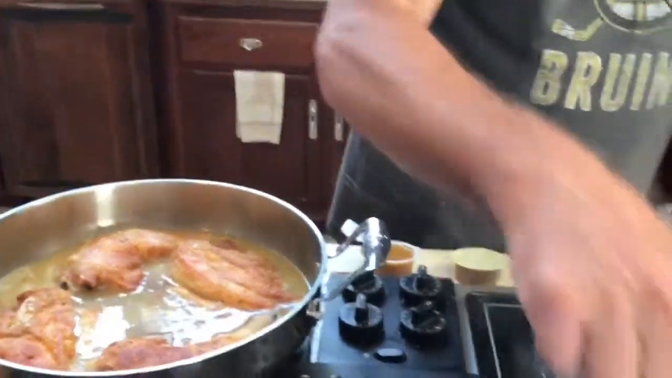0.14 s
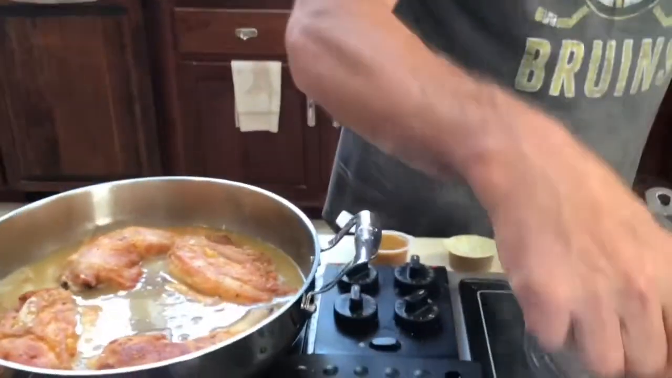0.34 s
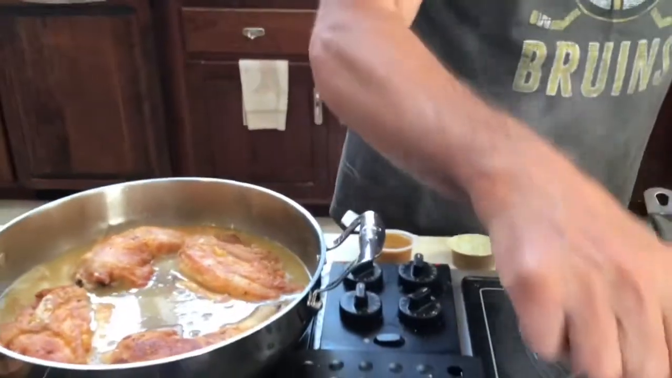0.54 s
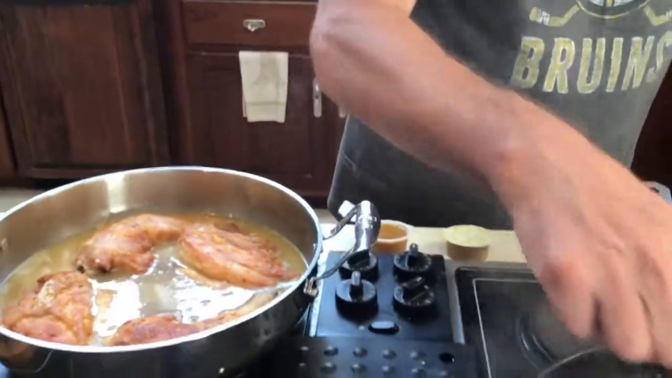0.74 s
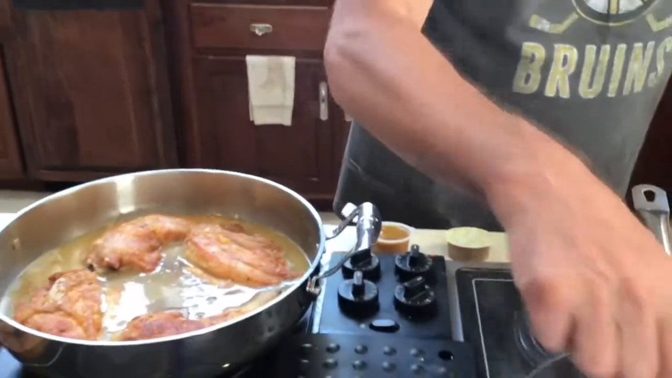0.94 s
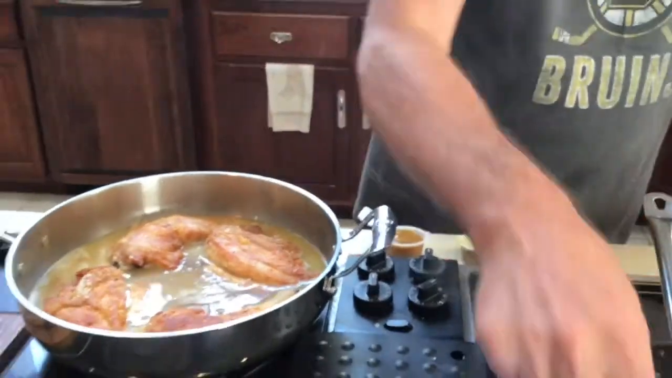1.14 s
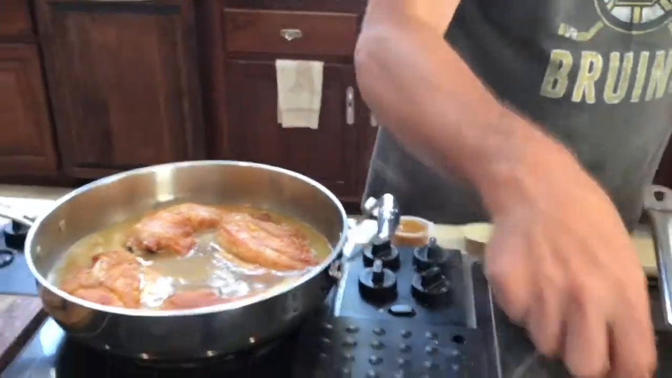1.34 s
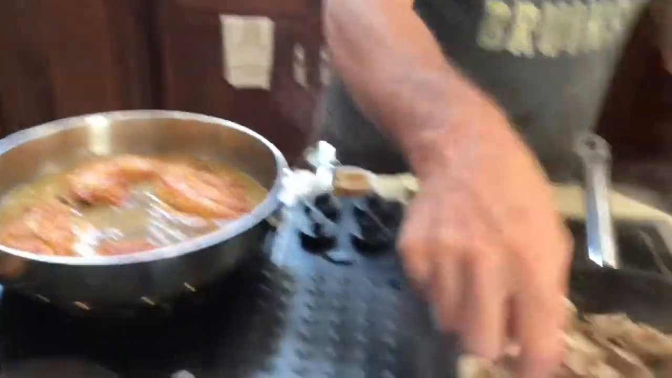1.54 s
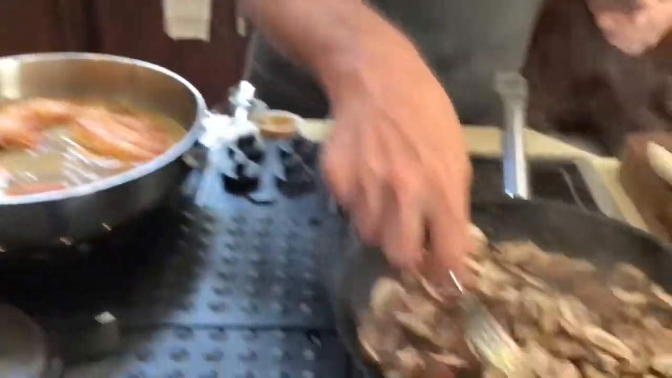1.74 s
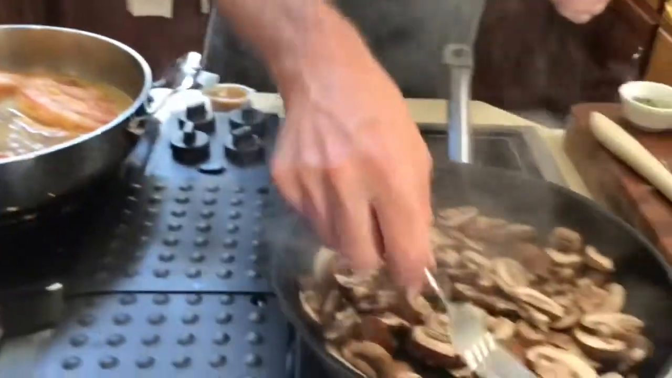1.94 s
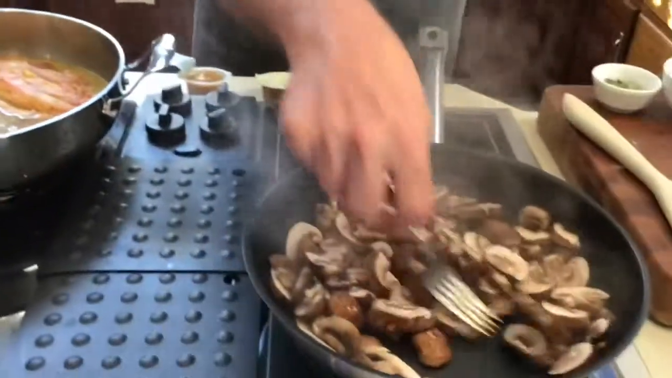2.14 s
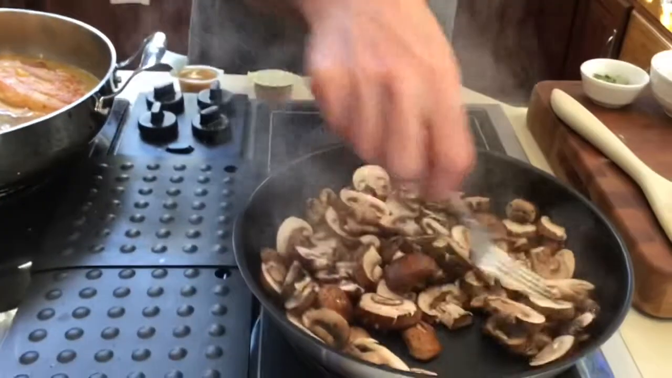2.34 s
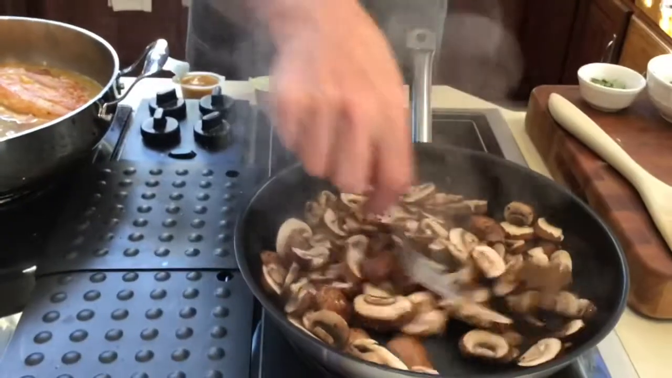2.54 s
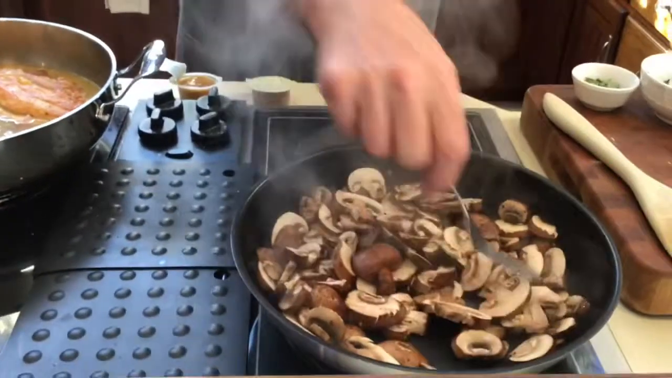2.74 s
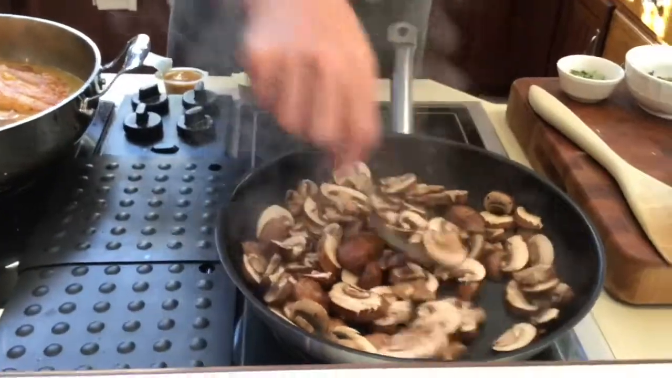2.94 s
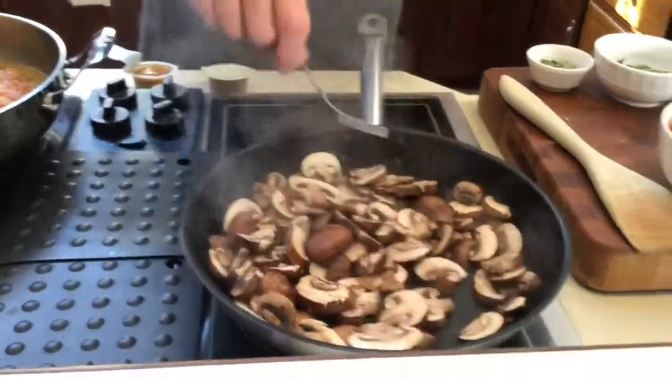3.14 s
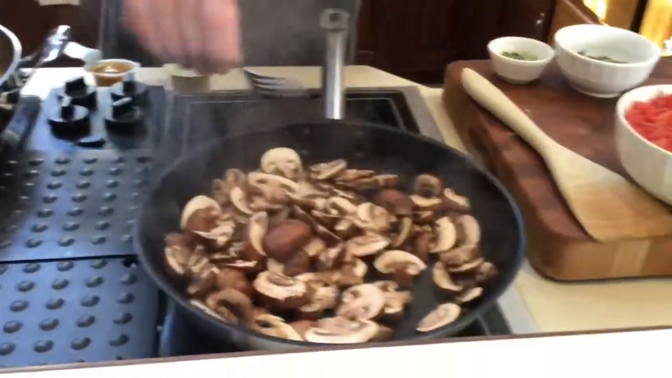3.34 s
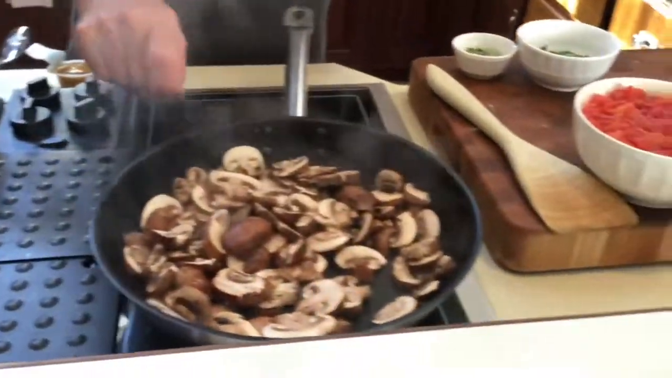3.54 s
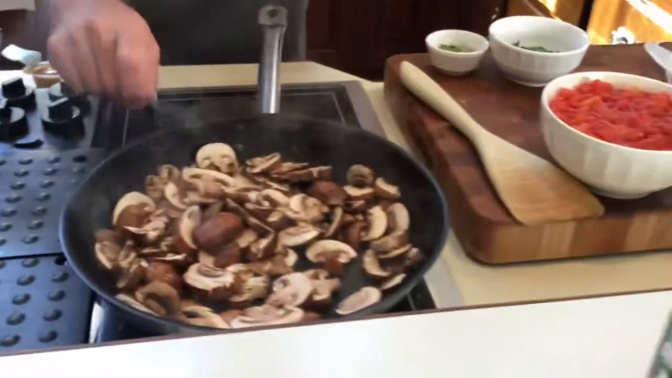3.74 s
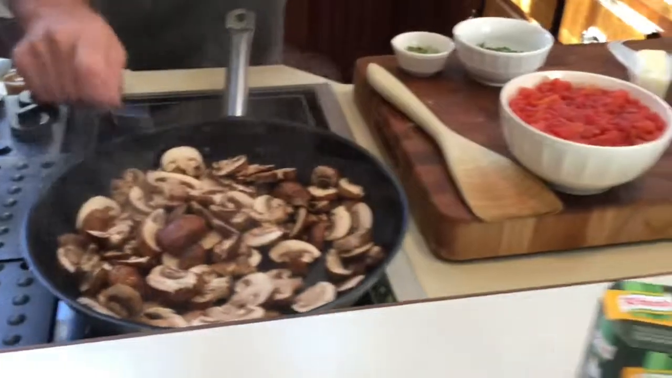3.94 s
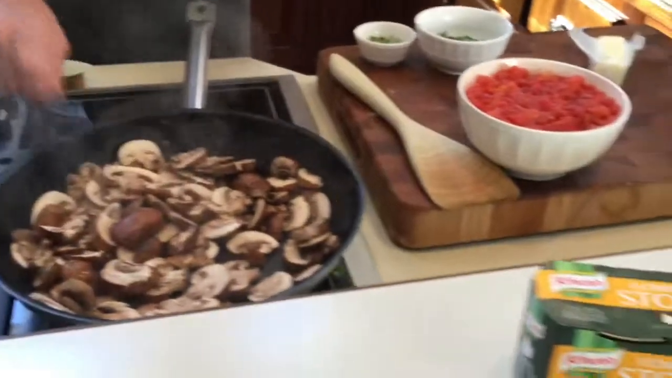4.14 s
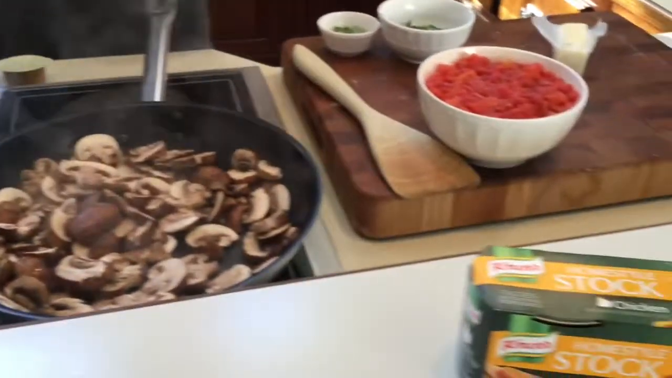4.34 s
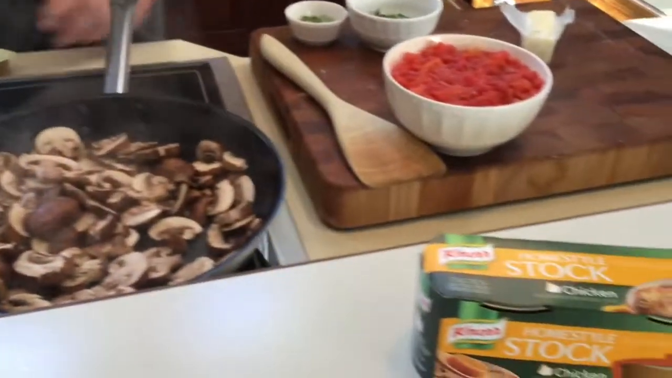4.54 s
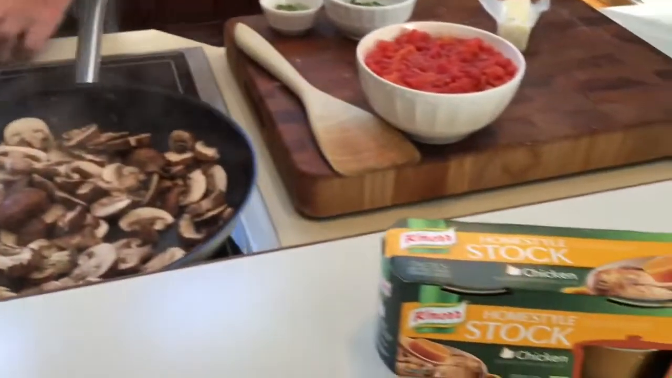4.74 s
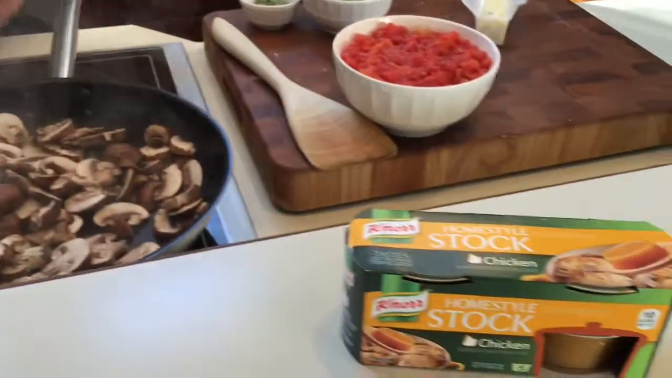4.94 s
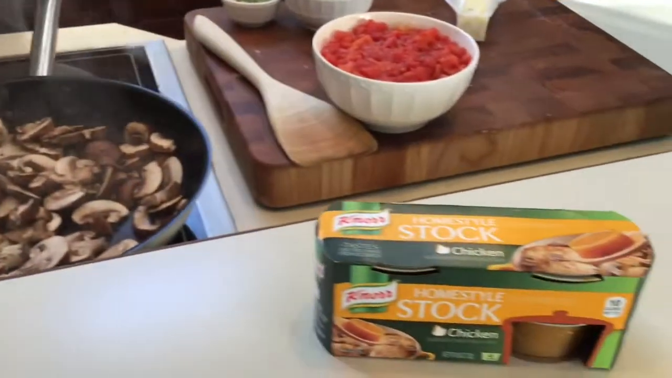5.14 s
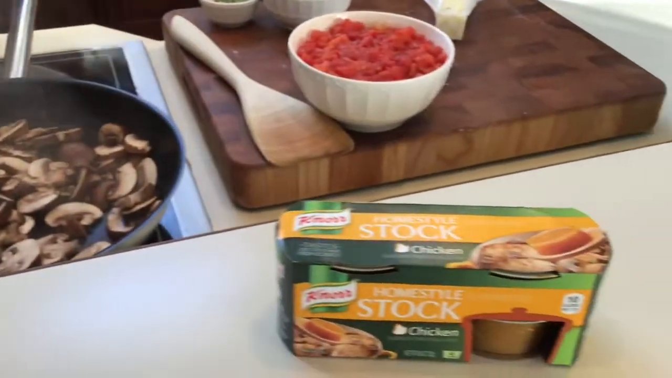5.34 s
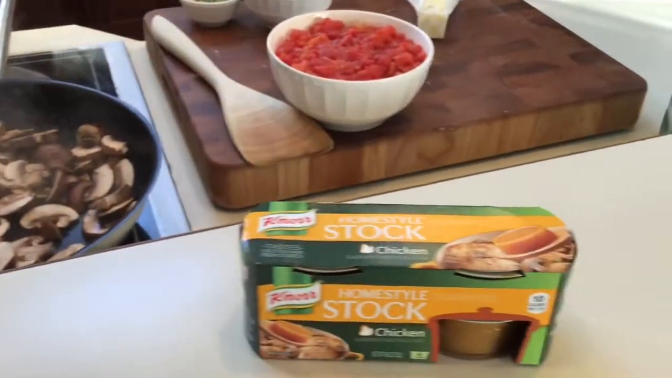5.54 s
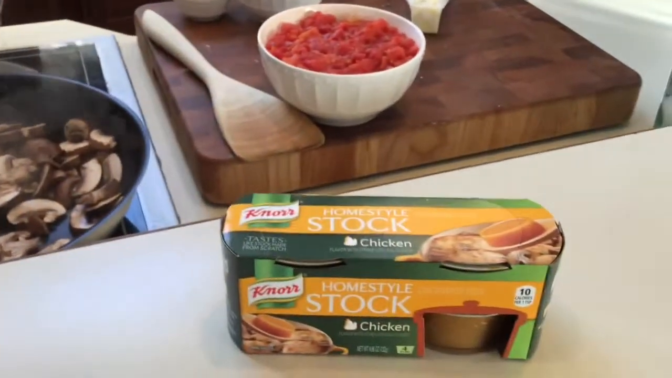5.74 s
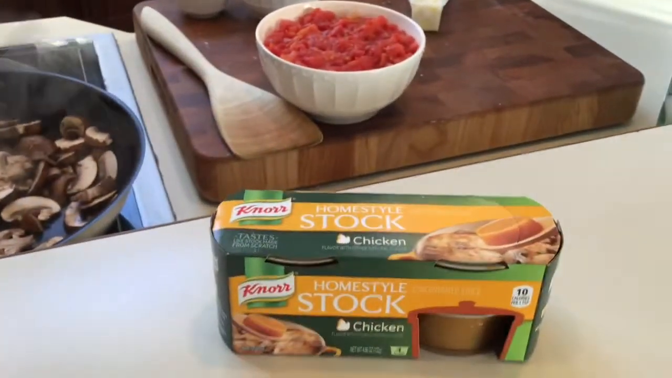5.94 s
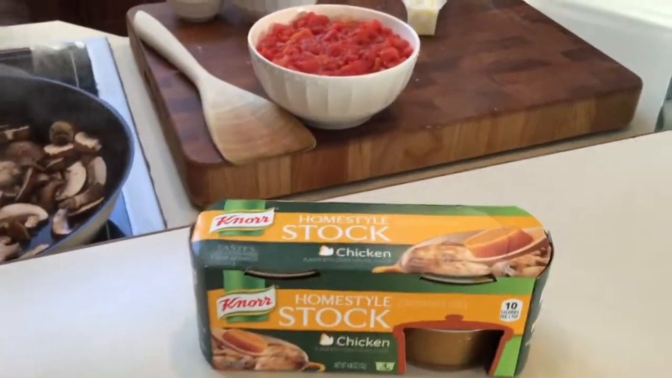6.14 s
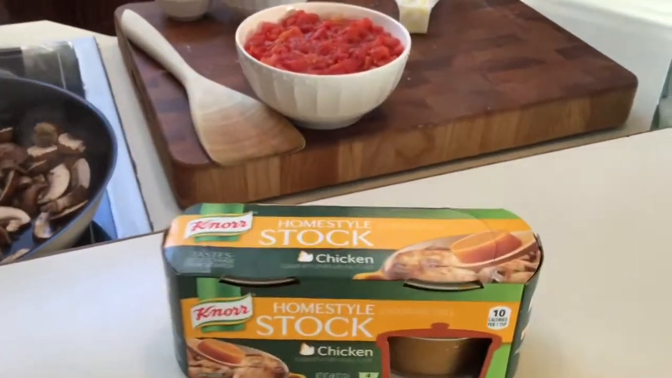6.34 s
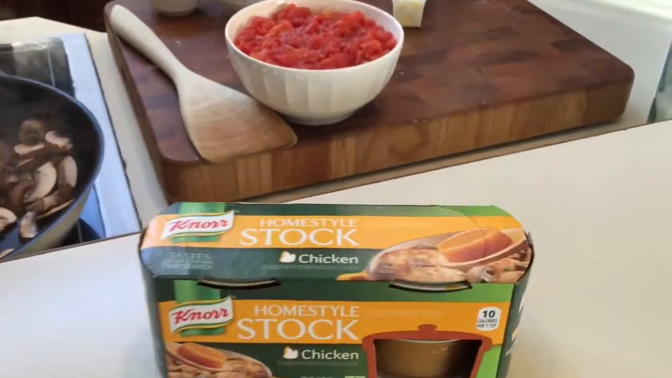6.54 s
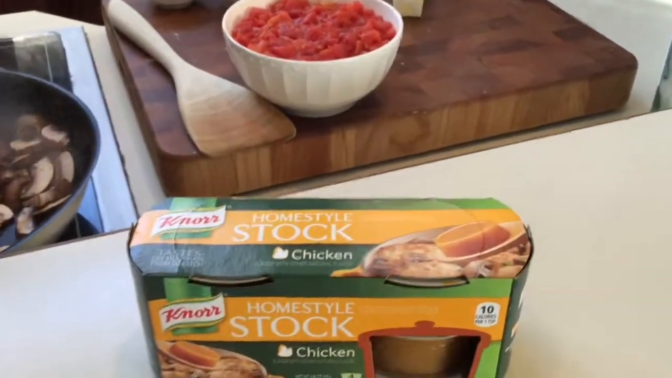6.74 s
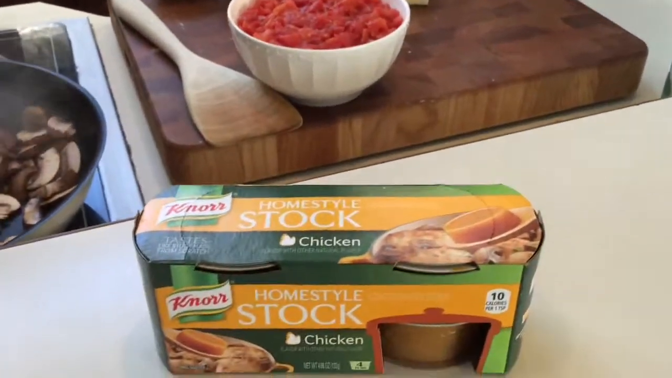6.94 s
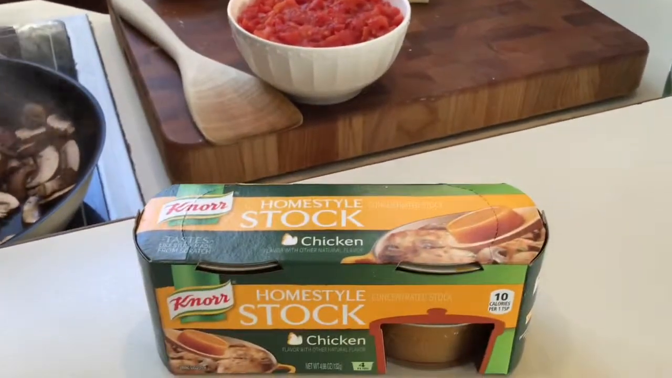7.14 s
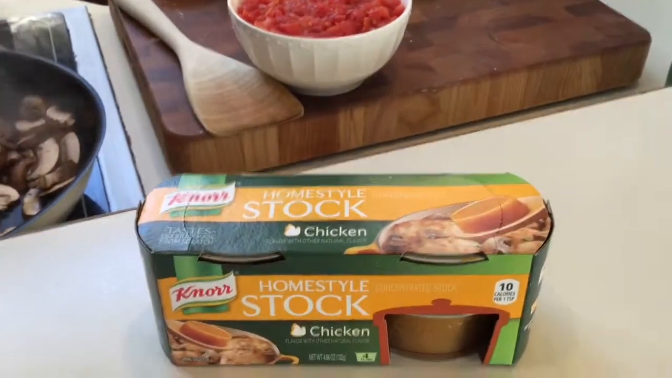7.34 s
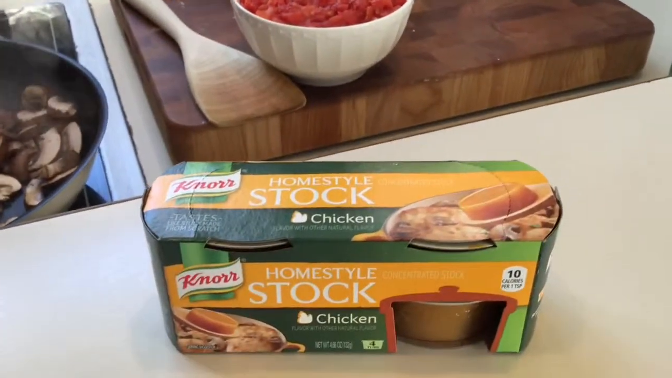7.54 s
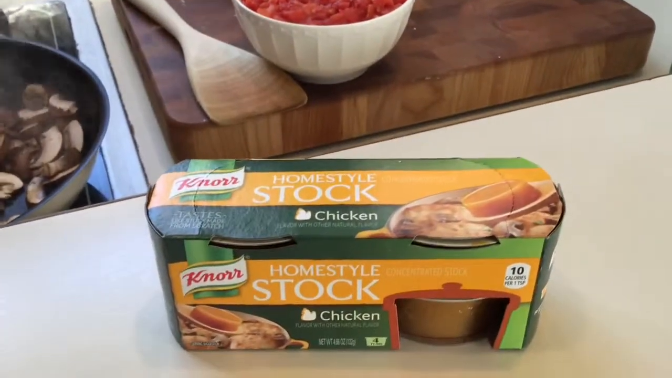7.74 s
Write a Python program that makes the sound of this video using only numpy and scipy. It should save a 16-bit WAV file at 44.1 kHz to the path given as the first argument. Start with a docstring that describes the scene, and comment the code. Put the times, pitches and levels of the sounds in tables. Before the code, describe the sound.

Sliced mushrooms sizzle in a frying pan, and a steel fork knocks four times on the rim with quick, ringing clanks.

```python
"""Mushrooms frying in a pan

Sliced mushrooms sizzle as steam bubbles burst and fat spits, while the microphone drifts away along
the kitchen counter. A steel fork bumps the pan once, then knocks four times on its rim: pan and hob
clank and the fork rings. Below lie a room hum, the hob's rush, dull rumbles and a faint sinking tone."""
import sys
import numpy as np
from scipy import signal
from scipy.fft import rfft, irfft
from scipy.io import wavfile

SR = 44100
rng = np.random.default_rng(int(sys.argv[2]) if len(sys.argv) > 2 else 0)


def master(y):
    """Save y as 16-bit WAV."""
    cut = np.clip(np.atleast_2d(y).T, -1, 1)
    pcm = np.round(cut * 32767)  # scale
    wavfile.write(sys.argv[1], SR, pcm.astype(np.int16))


N = 348390
TIME = np.arange(N) / SR

# Levels in the tables are relative. A t60 is the time a sound takes to fade by 60 dB.
# how loud the sizzle is over time: t/s, level/dB
SIZZLE_LEVELS = [(0.0, -32.5), (0.61, -33.5), (0.77, -34.5), (1.8, -36), (2.27, -35.5), (4.03, -38.5),
                 (4.86, -41.5), (5.96, -42.5), (7.9, -43)]
# tone colour of the early, middle and late sizzle (the late one dips at 6-8 kHz): f/Hz, level/dB
EARLY_COLOUR = [(300, -32.5), (620, -14.5), (740, -27.5), (830, -16), (950, -18), (1120, -11.5),
                (1900, -10), (2500, -14), (4300, -6), (7000, -3), (8700, 0.5), (10000, -2.5), (12000, -10),
                (15000, -15)]
MIDDLE_COLOUR = [(300, -29), (600, -27), (830, -13), (930, -22), (1170, -14), (2500, -12.5), (3500, -11),
                 (4200, -6.5), (7400, -4), (8300, 0.5), (9400, -0.5), (10400, -9.5), (12500, -18.5),
                 (15000, -24)]
LATE_COLOUR = [(400, -19.5), (620, -17.5), (930, -22.5), (1100, -13), (1400, -13), (1650, -10), (5200, -6),
               (6000, -11.5), (7900, -12), (8150, 0.5), (9200, 0), (10200, -7), (12500, -15.5),
               (15000, -20.5)]
# shifts between those colours: start t/s, length/s, step (on a scale of 0 early, 1 middle, 2 late)
SIZZLE_COLOUR_CHANGES = [(0.099, 2, -0.24), (1.396, 0.53, 0.66), (4.46, .07, 0.83), (5.0, 3.3, 0.14)]
# tone colour of the room hum and of the hob's rush: f/Hz, level/dB
HUM_COLOUR = [(25, -14), (48, -6), (87, -8), (170, 0.5), (240, -2.5), (400, -9), (500, -16.5), (620, -8.5),
              (900, -18.5), (2000, -45)]
RUSH_COLOUR = [(35, -47), (60, -17), (118, -4.5), (165, 0.5), (230, -9), (400, -4.5), (550, -14),
               (900, -22), (1500, -28)]
# single spits of fat: t/s, peak level/dB, f/Hz
FAT_SPITS = [(0.1837, -17, 7580), (0.502, -8, 7550), (0.5804, -13.5, 6650), (0.7866, -12.5, 7900),
             (0.8106, -17, 6620), (0.8697, -14, 7590), (0.9817, -12, 7300), (1.292, -17, 7030),
             (2.7935, -18, 6600), (3.3992, -16.5, 7190), (6.5197, -28, 5470), (6.6542, -32, 3340),
             (6.7254, -33, 3630), (6.8372, -35, 3760), (7.625, -33, 3060), (7.7335, -27, 3880)]
# soft, dull rumbles: middle t/s, level/dB, half-length/s, f/Hz
DULL_RUMBLES = [(0.466, -60, 0.066, 80), (1.363, -55, 0.064, 233), (1.755, -49, 0.043, 200),
                (5.391, -48.5, 0.1, 179), (5.544, -52.5, .11, 226), (5.778, -51, 0.12, 206)]
# fork knocks: t/s, blow/dB, treble/dB, bounce delay/s, bounce/dB, handle/dB, neck/dB, tines/dB
RIM_KNOCKS = [(3.5388, -3.5, 9, 0.0017, -5, -4.5, -1, -5), (3.738, -6, 8.5, 0.028, -12, -6.5, -25, -4.5),
              (3.9271, -5.5, 4.5, 0.0038, -8, -9, -23, -3.5), (4.137, -5.5, 8, 0.011, -7, -18, -20, -3)]
# tone colour of the clank, the many crowded, short tones of pan and hob: f/Hz, level/dB
CLANK_COLOUR = [(50, -46), (150, 0.5), (300, -6), (750, -2.5), (1050, 0.5), (1400, -1.5), (1750, -1.5),
                (1900, -11), (2400, -7.5), (3500, -14.5), (4400, -16), (5400, -5.5), (9000, -3.5),
                (12000, -17.5), (15800, -29)]
# single tones at which pan and hob ring: f/Hz, level/dB, t60/s
PAN_TONES = [(92, -45, .5), (174, -28, .29), (197, -34, .35), (254, -34, .35), (263, -36, .35),
             (342, -32, .28), (359, -27, .2), (487, -38, .26), (512, -40, .28), (620, -42, .35),
             (672, -36, .5), (1020, -15, .035), (1150, -21, .04), (1303, -30, .23), (2024, -47, .4),
             (2587, -33, .13), (2950, -32, .07), (4043, -45, .35), (6306, -33, .14), (6464, -37, .28),
             (7348, -35, .24), (8787, -31, .18), (8978, -35, .24), (9750, -28, .06)]
# tones at which the fork rings: f/Hz, level/dB, t60/s, part (0 handle, 1 neck, 2 tines)
FORK_TONES = [(1724, -26.5, .5, 0), (2184, -26, .26, 1), (2225, -20, .06, 1), (2338, -35, .55, 1),
              (5060, -31, .22, 1), (5370, -30, .08, 2), (5480, -37, .4, 2), (5605, -39, .5, 2)]
# tone colour of the kitchen's echo: f/Hz, level/dB
ECHO_COLOUR = [(50, -31), (90, -22), (125, -11), (180, -10), (350, -2.5), (430, -10), (650, -4.5),
               (800, -11), (1100, -5.5), (1500, -10.5), (2500, -17), (5500, -12), (8700, -15), (15800, -52)]
# how long that echo lasts: f/Hz, t60/s
ECHO_FADES = [(100, 0.63), (400, 0.79), (1500, 0.72), (5000, 0.15), (12000, 0.8)]


def from_db(db):
    """Turns decibels into a factor to multiply by."""
    return 10 ** (np.asarray(db) / 20)


def rms_one(x):
    """Scales a sound so that its average strength (RMS) is 1."""
    return x / np.sqrt(np.mean(x ** 2) + 1e-20)


def at_hz(points, hz):
    """Reads a table between its frequencies, with octaves evenly spaced."""
    f, value = np.transpose(points)
    return np.interp(np.log(np.maximum(hz, 1)), np.log(f), value)


def add(out, start_s, sound):
    """Mixes a sound in at the given time."""
    i = max(round(start_s * SR), 0)
    out[i:i + len(sound)] += sound[:N - i]


def coloured(x, colour, size=8192):
    """Gives a sound a tone colour, using a filter that keeps the power of white noise."""
    gains = from_db(at_hz(colour, np.arange(size // 2 + 1) * SR / size))
    cepstrum = irfft(np.log(gains))
    # minimum phase: the filter never rings before the sound arrives
    cepstrum[1:size // 2] *= 2
    cepstrum[size // 2 + 1:] = 0
    response = irfft(np.exp(rfft(cepstrum)))
    return signal.fftconvolve(x, response / np.linalg.norm(response))[:len(x)]


def band(x, hz, octaves):
    """Keeps only a band of pitches around hz."""
    edges = np.clip([hz / 2 ** (octaves / 2), hz * 2 ** (octaves / 2)], 10, .48 * SR)
    return signal.sosfilt(signal.butter(2, edges, "band", fs=SR, output="sos"), x)


def drift(per_s):
    """A curve that wanders to a new random value per_s times a second."""
    times = np.arange(0, N / SR + 1, 1 / per_s)
    return rms_one(np.interp(TIME, times, rng.standard_normal(len(times))))


def fade(t, t60):
    """Falls 60 dB in t60 seconds; silent before t = 0."""
    return (t >= 0) * np.exp(-np.log(1000) * np.maximum(t, 0) / t60)


def bubble_bursts(per_s, spread_db, clump_db, size_cap):
    """Steam bubbles burst at random, in clumps: many tiny, a few large."""
    bursting = rng.random(N) < per_s * from_db(clump_db * drift(25)) / SR
    sizes = from_db(spread_db * np.minimum(rng.exponential(1, N), size_cap))
    return rms_one(bursting * sizes * rng.choice([-1, 1], N))


def colour_blend(start=0.26):
    """The sizzle's tone colour shifts, slowly or abruptly."""
    shifts = (step * np.clip((TIME - s) / length, 0, 1) for s, length, step in SIZZLE_COLOUR_CHANGES)
    return start + sum(shifts)


def sizzle(gain_db=-1.5):
    """Bubbles crackle over a fine hiss; later on the crackle is softer."""
    blend = colour_blend()
    crackle = bubble_bursts(per_s=4000, spread_db=3, clump_db=2.5, size_cap=4.6)
    pings = 0
    for hz in np.geomspace(2200, 11000, num=9):  # larger bubbles ring briefly at their own pitch
        pops = bubble_bursts(per_s=200, spread_db=4, clump_db=4.5, size_cap=4.54)
        pings += band(pops, hz, octaves=0.39) / np.sqrt(hz)
    hiss = rng.standard_normal(N) * from_db(.5 * drift(11))
    bubbles = from_db(0.5) * crackle + from_db(-8) * rms_one(pings)
    source = rms_one(from_db(-1) * hiss + from_db(-2.5 * blend) * bubbles)
    out = 0
    for k, (colour, db) in enumerate([(EARLY_COLOUR, 1), (MIDDLE_COLOUR, 1.2), (LATE_COLOUR, 2)]):
        share = np.maximum(1 - abs(blend - k), 0)
        out += share * from_db(db) * coloured(source, colour)
    level_db = np.interp(TIME, *np.transpose(SIZZLE_LEVELS))
    return out * from_db(gain_db + level_db)


def room_hum(db=-62):
    """The room hums with a steady, low noise."""
    return from_db(db) * coloured(rng.standard_normal(N), HUM_COLOUR)


def hob_rush(db=-62.5, pass_s=1.5, rise_db=3, half_width_s=0.61, gone_s=4.1):
    """The hob's low rush swells as the microphone passes over it and fades as it leaves."""
    swell = from_db(rise_db / (1 + ((TIME - pass_s) / half_width_s) ** 2))
    leaving = np.clip(gone_s - TIME, 0, 1)
    return leaving * swell * from_db(db) * coloured(rng.standard_normal(N), RUSH_COLOUR)


def fat_spits(gain_db=-0.5, ring_db=-14, room_db=-38, room_t60=0.061, top_hz=12000, delay_s=0.00127):
    """A drop of fat snaps and fizzes, with a trace of room echo."""
    out, t = np.zeros(N), TIME[:SR // 10]
    for s, db, hz in FAT_SPITS:
        t60 = 0.0034 * (7000 / hz) ** 1.7  # lower spits ring longer
        octaves = min(1.8, 38 / (hz * t60))  # a longer ring has a clearer pitch
        fizz_shape = from_db(ring_db) * fade(t, t60) + from_db(room_db) * fade(t, room_t60)
        fizz = rng.standard_normal(len(t)) * fizz_shape
        snap = band(signal.unit_impulse(len(t)) + fizz, hz, octaves)
        snap = signal.sosfilt(signal.butter(3, top_hz, fs=SR, output="sos"), snap)
        add(out, s + delay_s, from_db(db + gain_db) * snap / abs(snap).max())
    return out


def rumbles():
    """Low, dull noise swells briefly and dies away."""
    out = np.zeros(N)
    for middle_s, db, half_s, hz in DULL_RUMBLES:
        swell = np.hanning(round(2 * half_s * SR))
        noise = band(rng.standard_normal(SR), hz, octaves=0.62)[-len(swell):]
        strength = from_db(db) * np.sqrt(np.mean(swell ** 2))
        add(out, middle_s - half_s, strength * rms_one(noise * swell))
    return out


def fork_bump(start_s=1.737, peak_db=-40, hz=650, t60=.02):
    """The stirring fork bumps the pan once; the mushrooms muffle the knock."""
    out, t = np.zeros(N), TIME[:SR // 10]
    knock = band(rng.standard_normal(len(t)) * fade(t, t60), hz, octaves=1.4)
    add(out, start_s, from_db(peak_db) * knock / abs(knock).max())
    return out


def sinking_tone(start_s=3.07, peak_db=-47.5, length_s=.22, hz=136, sink_hz_per_s=200):
    """A faint, low tone swells and fades as its pitch sinks."""
    out, t = np.zeros(N), TIME[:round(length_s * SR)]
    tone = np.sin(2 * np.pi * (hz - sink_hz_per_s * t / 2) * t)
    add(out, start_s, from_db(peak_db) * np.hanning(len(t)) * tone)
    return out


def blow(t):
    """The outline of one hit: a sharp crack and a longer clank, both fading."""
    return from_db(-13) * fade(t, t60=0.003) + from_db(-15) * fade(t, t60=0.083)


def clank(t, treble_db, delay_s, bounce_db, contact_db=13.5, echo_db=-28):
    """One solid hit and its bounce shake pan and hob, and the kitchen echoes."""
    contact = from_db(contact_db) * band(signal.unit_impulse(len(t)), hz=1100, octaves=0.9)
    chatter = rng.choice([-1, 1], len(t)) * np.hypot(blow(t), from_db(bounce_db) * blow(t - delay_s))
    echo = sum(band(rng.standard_normal(len(t)), hz, octaves=1) * fade(t, at_hz(ECHO_FADES, hz))
               for hz in 55 * 2. ** np.arange(9))
    echo *= 1 - fade(t, t60=0.035)  # the echo takes a moment to build up
    body = coloured(contact + chatter, CLANK_COLOUR) + from_db(echo_db) * coloured(echo, ECHO_COLOUR)
    treble = signal.sosfilt(signal.butter(1, 4000, "high", fs=SR, output="sos"), body)
    return body + (from_db(treble_db) - 1) * treble  # a harder contact is brighter


def ring(t, hz, t60):
    """One tone of struck metal builds up over about two cycles, then fades."""
    build_up = 1 - np.exp(-hz * t / 2)
    return rng.choice([-1, 1]) * np.sin(2 * np.pi * hz * t) * fade(t, t60) * build_up


def fork_knocks(pan_db=1.5, fork_db=6, thud_db=-11, thud_growth=4.7):
    """The fork hits the rim: pan and hob clank, then they and the fork ring on."""
    out, t = np.zeros(N), TIME[:SR]
    for s, blow_db, treble_db, delay_s, bounce_db, *part_db in RIM_KNOCKS:
        body = clank(t, treble_db, delay_s, bounce_db)
        pan = sum(from_db(pan_db + db + rng.normal()) * ring(t, hz, t60) for hz, db, t60 in PAN_TONES)
        # where the fork is struck decides which of its parts ring
        fork = sum(from_db(fork_db + db + part_db[round(part)]) * ring(t, hz, t60)
                   for hz, db, t60, part in FORK_TONES)
        # a heavy blow also thuds through the stove
        thud = from_db(thud_db + thud_growth * blow_db) * ring(t, hz=62, t60=.08)
        add(out, s, from_db(blow_db) * body + from_db(blow_db / 2) * pan + fork + thud)
    return out


def scene():
    """All the sounds reach one microphone, which feeds both channels."""
    cooking = sizzle() + fat_spits() + fork_knocks() + fork_bump()
    background = rumbles() + sinking_tone() + room_hum() + hob_rush()
    return np.tile(cooking + background, (2, 1))


def record(dry, bass_hz=38, top_hz=15900, ceiling=1.3):
    """Cuts the deep bass, rounds off loud peaks and cuts the highest treble."""
    x = signal.sosfilt(signal.butter(8, bass_hz, "high", fs=SR, output="sos"), dry)
    x = ceiling * np.tanh(x / ceiling)
    return signal.sosfilt(signal.ellip(10, .1, 70, top_hz, fs=SR, output="sos"), x)


dry = scene()
out = record(dry)
master(out)
```